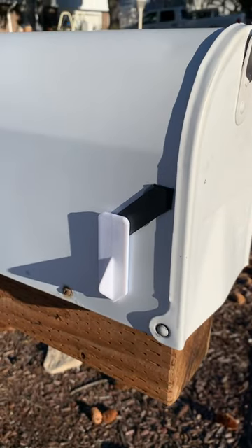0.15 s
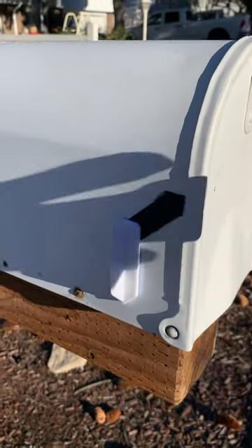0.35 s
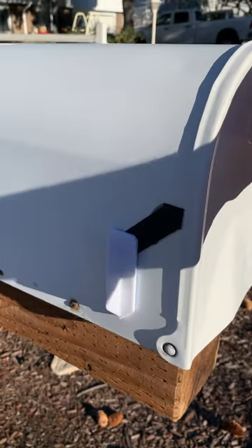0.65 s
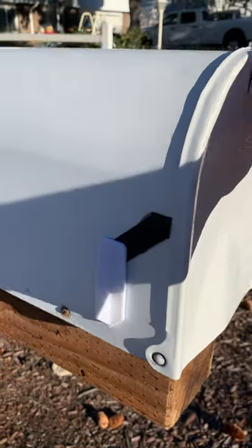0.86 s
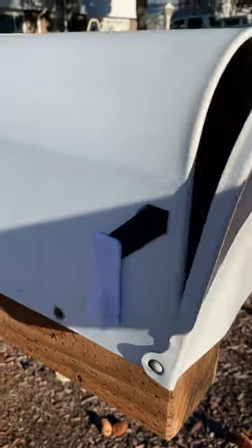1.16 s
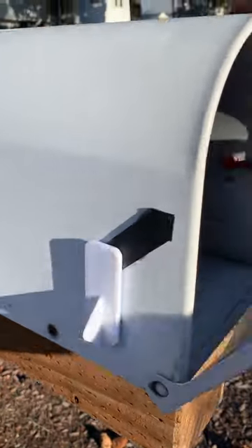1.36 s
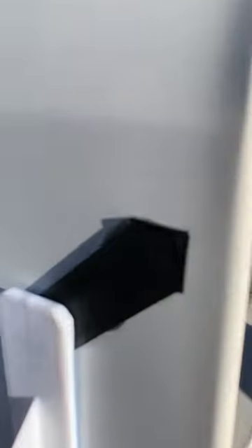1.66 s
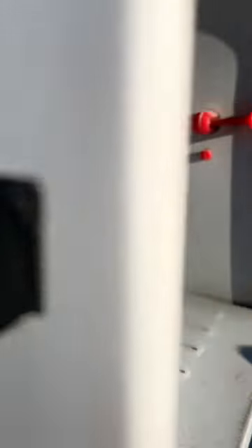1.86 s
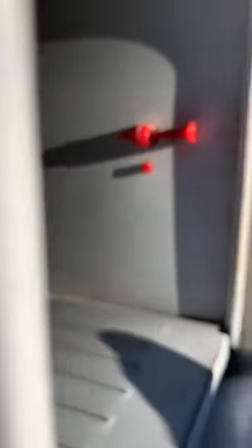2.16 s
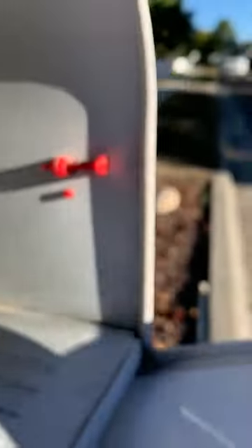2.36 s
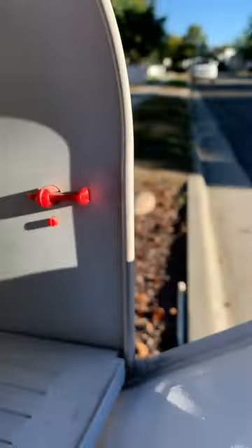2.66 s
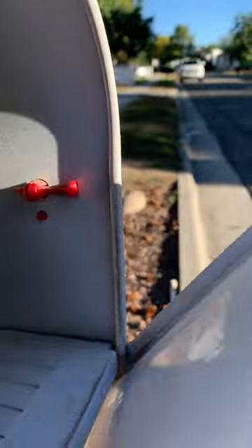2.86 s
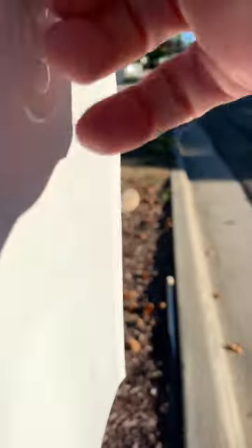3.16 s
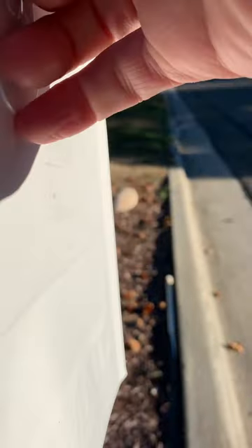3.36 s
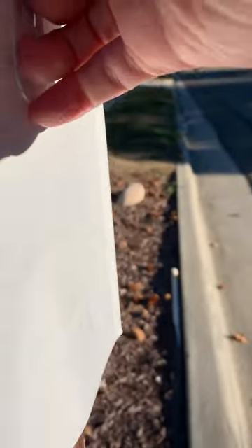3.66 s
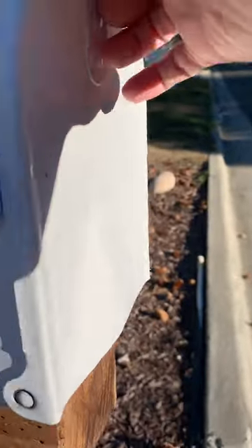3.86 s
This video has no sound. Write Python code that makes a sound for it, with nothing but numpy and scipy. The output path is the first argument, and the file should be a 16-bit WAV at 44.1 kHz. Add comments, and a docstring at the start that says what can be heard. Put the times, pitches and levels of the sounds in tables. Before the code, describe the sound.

A metal mailbox door, heard close outdoors: a short latch creak and light knocks, then hinge scraping and clanks, heavy hollow bangs, a sharp ringing snap and a last creak, over faint birds and distant traffic.

```python
"""A sheet-metal mailbox by a quiet street, heard from close by: its door is knocked, scrapes and snaps shut.
Blows and scrapes are contact forces that excite the decaying modes of the box; heavy blows rock its post.
The latch creaks by stick-slip, the catch rings, and the hinge squeaks in one high resonance.
A sleeve rustles and the handled box rumbles (shaped noise). Behind them small birds chirp and whistle
(gliding tones with echoes) and distant traffic hums (shaped noise)."""
import sys
import numpy as np
from scipy import signal
from scipy.fft import rfft, irfft
from scipy.io import wavfile

SR = 44100
rng = np.random.default_rng(int(sys.argv[2]) if len(sys.argv) > 2 else 0)


def inscribe(sig):
    """Save sig as 16-bit PCM at rate SR to the path in sys.argv[1].

    A 1-D sig is mono; a 2-D sig holds one channel per row.
    Samples are clipped to [-1, 1] before scaling.
    """
    pcm = np.round(np.clip(np.atleast_2d(sig).T, -1, 1) * 32767)
    wavfile.write(sys.argv[1], SR, pcm.astype(np.int16))


N = 176400
T = np.arange(N) / SR
HZ = np.arange(N + 1) * SR / (2 * N)   # frequency bins of a transform of length 2 N
HALF_SECOND = SR // 2   # length of every impulse response [samples]
BLOW_SPREAD_DB = 4.5   # how unequally a contact spot excites the modes


def from_db(db):
    """Amplitude gain is ten to the power of decibels over twenty."""
    return 10 ** (np.asarray(db) / 20)


def rms_one(x):
    """Normalise the mean power: unit rms."""
    return x / np.sqrt(np.mean(x ** 2) + 1e-20)


def unit_energy(x):
    """Normalise the total energy: unit sum of squares."""
    return x / np.sqrt(np.sum(x ** 2) + 1e-20)


def level(rows):
    """Envelope: gain over time through (time [s], level [dB]) points, silent outside them."""
    s, db = np.transpose(rows)
    return np.interp(T, s, from_db(db), left=0, right=0)


def colour(points):
    """Spectral envelope: gain through (frequency [Hz], level [dB]) points on a log-frequency axis."""
    hz, db = np.transpose(points)
    return from_db(np.interp(np.log(HZ + 1), np.log(hz), db))


def noise(points):
    """Subtractive synthesis: white noise filtered to a spectral envelope, unit rms."""
    white = rng.standard_normal(2 * N)
    return rms_one(irfft(rfft(white) * colour(points))[:N])


def drift(cutoff_hz):
    """Random modulation: low-passed white noise of unit rms."""
    lowpass = signal.butter(2, cutoff_hz, fs=SR, output="sos")
    return rms_one(signal.sosfilt(lowpass, rng.standard_normal(N)))


def dying(t60):
    """Exponential decay by 60 dB in t60 seconds, as of a linearly damped mode."""
    return np.exp(-np.minimum(np.log(1000) * T[:HALF_SECOND] / t60, 60))


def tail(spectrum, t60):
    """Dense modal decay: coloured noise under one exponential."""
    return noise(spectrum)[:HALF_SECOND] * dying(t60)


def ring(modes):
    """Modal synthesis: one damped sine per row of (frequency [Hz], level [dB], t60 [s])."""
    return np.array([from_db(db) * np.sin(2 * np.pi * hz * T[:HALF_SECOND]) * dying(t60)
                     for hz, db, t60 in modes])


def through(x, response):
    """Linear system: convolve a force or sound with an impulse response."""
    return signal.fftconvolve(x, response)[:N]


def add(out, s, x):
    """Superposition: mix a sound in at s seconds."""
    i = max(int(s * SR), 0)
    out[i:i + len(x)] += x[:max(N - i, 0)]


def box_responses(modes, washes):
    """Impulse response of the box in each register: main modes plus panel wash, band-passed."""
    # registers boom, body, clang, tick: (lower edge [Hz], upper edge [Hz])
    registers = [(150, 300), (300, 1200), (1200, 4800), (4800, 16000)]
    responses = []
    for band, wash in zip(registers, washes):
        bandpass = signal.butter(3, band, "band", fs=SR, output="sos")
        responses.append(unit_energy(signal.sosfilt(bandpass, modes + wash)))
    return responses


def slips():
    """Dry friction as a random train of uneven micro-impacts of metal on metal, unit rms."""
    slips_per_s, spread_db = 600, 5   # mean rate, scale of the exponential spread
    sizes = from_db(spread_db * np.minimum(rng.exponential(1, N), 4))
    signs = rng.choice([-1, 1], N)
    return rms_one(sizes * signs * (rng.random(N) < slips_per_s / SR))


def door():
    """Source and resonator: knocks and scrapes drive the same main modes, crack and panel wash."""
    # main modes of the box: (frequency [Hz], relative level [dB], t60 [s])
    box_modes = [(211.5, 3.5, 0.25), (250, 5, 0.12), (302.3, 0, 0.061), (441.7, -4, 0.11),
                 (507.6, 7.5, 0.11), (851.5, 3, 0.092), (1149, -0.5, 0.066), (1431, -4, 0.12),
                 (1590, -11, 0.23), (1878, -8.5, 0.15), (1950, -11.5, 0.072), (2173, -8.5, 0.13),
                 (3665, -11, 0.06)]
    # spectrum of its crowd of weaker panel modes: (frequency [Hz], relative level per Hz [dB])
    panel = [(100, -45), (300, -2.5), (600, 4), (1200, 2.5), (2100, -7), (2700, -10.5), (3700, -8.5),
             (5000, -11.5), (9000, -16), (15000, -25.5)]
    panel_db, panel_t60_s, treble_t60_s = 7, 0.15, 0.074
    crack_db, crack_t60_s = 15, 0.028
    modes = ring(box_modes)
    crack = from_db(crack_db) * tail(panel, crack_t60_s)
    t60s = [panel_t60_s] * 3 + [treble_t60_s]   # one per register
    washes = np.array([crack + from_db(panel_db) * tail(panel, t60) for t60 in t60s])
    return knocks(modes, washes) + scrapes(modes, washes)


def knocks(modes, washes):
    """Impact excitation: each blow is a rising graze, a touch and dying chatter that drive the box."""
    # blows: (time [s], boom [dB], body [dB], clang [dB], tick [dB], chatter time constant [s])
    # a level sets the energy: that of 20 ms at this rms
    blows = [(0.942, -29, -32, -36.5, -42.5, 0.011), (1.052, -26.5, -32.5, -35.5, -35, 0.035),
             (1.079, -29.5, -41, -37.5, -47, 0.012), (1.123, -32, -34.5, -52, -61, 0.074),
             (1.922, -46, -48, -53.5, -57.5, 0.024), (2.447, -42, -44, -26.5, -44, 0.061),
             (2.492, -28, -24.5, -25, -37.5, 0.012), (2.537, -34, -39, -29, -47, 0.018),
             (2.583, -59, -48, -55, -46.5, 0.004), (3.128, -23, -22.5, -29, -30.5, 0.027),
             (3.1439, -30.5, -30, -28, -43.5, 0.0082), (3.163, -23, -27, -31.5, -42.5, 0.095),
             (3.2238, -18, -25, -30.5, -27.5, .0066), (3.265, -44, -28.5, -35.5, -49, 0.0027),
             (3.358, -34, -30.5, -35, -50, 0.017), (3.5701, -37.5, -32, -19.5, -25.5, 0.0059),
             (3.907, -40, -33, -30.5, -42.5, 0.022)]
    # weight of the touch pulse against the chatter: boom, body, clang, tick
    first_touch = [3.1, 0.63, 0.82, .2]
    touch_s = 0.0096   # chatter time at which the pulse has just these weights; shorter chatter, stronger pulse
    lead_in_share = .3   # time constant of the graze as a share of the chatter's
    out, lead = np.zeros(N), SR // 20
    since = T[:SR // 3] - T[lead]   # time from the touch
    for s, *levels_db, chatter_s in blows:
        age = np.where(since < 0, -since / lead_in_share, since) / chatter_s
        rattle = slips()[:len(since)] + .5 * rng.standard_normal(len(since))
        chatter = unit_energy(rattle * np.exp(-np.minimum(age, 20)))
        # each blow strikes the modes with other strengths
        struck = from_db(BLOW_SPREAD_DB * rng.standard_normal(len(modes))) @ modes
        for response, db, touch in zip(box_responses(struck, washes), levels_db, first_touch):
            force = chatter + touch * touch_s / chatter_s * (since == 0)
            blow = unit_energy(through(force, response)) * np.sqrt(SR / 50)
            add(out, s - T[lead], from_db(db) * blow)
    return out


def scrapes(modes, washes):
    """Friction excitation: hinge and rim slip while contact wanders between two spots with other modes."""
    # rubbing pressure of hinge and of rim: (time [s], level [dB])
    hinge = [(2.134, -60), (2.138, -31.5), (2.18, -38), (2.26, -34), (2.274, -27), (2.36, -48),
             (2.416, -29.5), (2.47, -44), (2.56, -36), (2.61, -64), (2.7, -44), (2.76, -73), (2.88, -43),
             (3.1, -62)]
    rim = [(3.45, -52), (3.485, -38), (3.52, -37), (3.54, -27.5), (3.59, -37), (3.70, -57), (3.75, -43.5),
           (3.81, -79)]
    # their balance over the registers [dB]: boom, body, clang, tick
    hinge_db = [-9.5, 0.5, -8.5, -18.5]
    rim_db = [-8.5, -2, -7, -24]
    wash_db = -7
    pressure = from_db(hinge_db)[:, None] * level(hinge) + from_db(rim_db)[:, None] * level(rim)
    out, wander = np.zeros(N), drift(10.7)
    favoured = BLOW_SPREAD_DB * rng.standard_normal(len(modes))
    for spot in (-1, 1):
        share = np.sqrt((1 + spot * np.tanh(2 * wander)) / 2)   # the two powers sum to one
        forces = share * slips() * pressure
        responses = box_responses(from_db(spot * favoured) @ modes, from_db(wash_db) * washes)
        for force, response in zip(forces, responses):
            out += through(force, response)
    return out


def post():
    """Low-frequency modes: heavy blows rock the box on its post; the deepest bass does not radiate."""
    # blows: (time [s], level [dB])
    thuds = [(1.117, -37.5), (2.495, -37), (2.54, -34.5), (3.133, -27.5), (3.227, -28.5)]
    # modes of box on post: (frequency [Hz], relative level [dB], t60 [s])
    post_modes = [(67.3, -1, 0.49), (88.6, 0, 0.33), (115, 4.5, 0.2)]
    out = np.zeros(N)
    for s, db in thuds:
        add(out, s, from_db(db) * ring(post_modes).sum(axis=0))
    return signal.sosfilt(signal.butter(2, 60, "high", fs=SR, output="sos"), out)


def catch():
    """Free vibration: the spring catch gives one short, hard ring and a faint singing tail."""
    # modes of the catch: (frequency [Hz], relative level [dB], t60 [s])
    catch_modes = [(1680, -8.5, 0.018), (1980, -4.5, 0.026), (3670, -6.5, 0.011), (1546, -22.5, 0.17)]
    snap_s, snap_db = 3.5705, -3.5
    out = np.zeros(N)
    add(out, snap_s, from_db(snap_db) * ring(catch_modes).sum(axis=0))
    return out


def creaks():
    """Stick-slip oscillation: the latch swells into a rough harmonic tone, lets go and rings out, sagging."""
    # creaks of the latch: (time of the peak [s], level [dB], mean pitch at the peak [Hz])
    latch = [(.946, -21, 430.2), (3.909, -15, 390.5)]
    # mean level of each harmonic from the first up [dB]
    partials_db = [2.5, -12.5, -20, -14, -18.5]
    rise_s, fall_s, tail_s, tail_db = .027, .003, .05, -9
    jitter, sag_per_s = .065, .5   # as fractions of the pitch
    rest = from_db(tail_db)
    out = np.zeros(N)
    for s, db, hz in latch:
        before, after = np.maximum(s - T, 0), np.maximum(T - s, 0)
        swell = np.maximum(1 - before / rise_s, 0) ** 2
        release = (1 - rest) * np.exp(-after / fall_s) + rest * np.exp(-after / tail_s)
        pitch = hz * (1 - sag_per_s * np.clip(T - s, -.05, .05) + jitter * drift(152.0))
        phase = 2 * np.pi * np.cumsum(pitch) / SR
        tone = np.zeros(N)
        for k, part_db in enumerate(partials_db, 1):
            tone += from_db(part_db + 2 * drift(44)) * np.sin(k * phase)
        out += from_db(db) * swell * release * tone
    return out


def squeaks():
    """Resonance under friction: bursts of slips set the hinge pin singing in one high mode."""
    # bursts: (time of the peak [s], level [dB])
    bursts = [(2.295, -33.5), (2.54, -39)]
    hz, width_s, t60_s = 3680, 0.011, 0.017
    song = rms_one(through(slips(), ring([(hz, 0, t60_s)])[0]))
    return song * sum(from_db(db) * np.exp(-((T - s) / width_s) ** 2) for s, db in bursts)


def handling(grain_db=2, lump_db=2):
    """Modulated noise: the grainy rustle of the sleeve and the low rumble of the handled box."""
    # strength of sleeve and of rumble: (time [s], level [dB])
    sleeve = [(0, -69), (1.0, -67), (1.1, -51.5), (1.3, -49), (1.55, -57.5), (2.0, -74), (2.225, -46.5),
              (2.38, -81), (2.68, -54), (2.85, -42), (3.1, -40), (3.3, -51.5), (3.45, -76), (4, -61.5)]
    rumble = [(0, -57), (1.0, -50), (1.15, -39), (1.5, -44.5), (2.0, -50.5), (2.4, -43.5), (2.55, -36.5),
              (2.8, -52.5), (2.865, -34.5), (2.92, -42), (3.05, -42.5), (3.25, -33), (3.5, -50), (4, -51.5)]
    # their spectra: (frequency [Hz], relative level [dB])
    sleeve_colour = [(200, 13), (500, 0.5), (1200, 7), (2500, 0), (4000, 1.5), (7000, -2.5), (10000, -5.5),
                     (15000, -11.5)]
    rumble_colour = [(30, -62), (60, 1), (100, 7), (160, -12), (225, 2), (330, -16), (470, -7.5),
                     (800, -16), (2000, -62)]
    rustling = level(sleeve) * noise(sleeve_colour) * from_db(grain_db * drift(180))
    rumbling = level(rumble) * noise(rumble_colour) * from_db(lump_db * drift(7.3))
    return rustling + rumbling


def birds():
    """Frequency modulation: two-voiced warbling hooks and gliding whistles, smeared by street echoes."""
    # hooked chirps: (start [s], level [dB])
    chirps = [(.125, -53), (.27, -54), (.43, -54), (.64, -55), (.815, -50), (1.225, -53), (1.40, -50),
              (1.44, -51), (1.70, -47), (2.05, -52), (2.34, -52), (2.555, -48), (3.805, -51)]
    # pitch of a hook: (time in the chirp [s], frequency [Hz])
    chirp_shape = [(0, 3400), (.015, 4250), (.036, 3510), (.065, 3256)]
    # straight whistles: (start [s], first pitch [Hz], last pitch [Hz], level [dB])
    whistles = [(.325, 3230, 4300, -45.5), (0.563, 2900, 3700, -47.5), (0.34, 9800, 4900, -57)]
    call_s, warble, pitch_spread = 0.055, 0.028, 0.026   # the last two as fractions of the pitch
    second_voice, second_voice_db = 1.1, 0   # parallel voice: pitch ratio and level at the start
    echo_db, echo_t60_s = 3.5, 0.12
    u = np.linspace(0, 1, int(call_s * SR))   # progress through a call
    hook = np.interp(u * call_s, *np.transpose(chirp_shape))
    calls = [(s, hook, db, from_db(second_voice_db)) for s, db in chirps]
    calls += [(s, low + (high - low) * u, db, 0) for s, low, high, db in whistles]
    out = np.zeros(N)
    for s, glide, db, second in calls:
        detune = pitch_spread * rng.standard_normal()
        pitch = glide * (1 + detune + warble * (1 - u) * drift(430)[-len(u):])
        phase = 2 * np.pi * np.cumsum(pitch) / SR
        # the second voice fades as the first grows
        voices = np.sqrt(u) * np.sin(phase) + second * (1 - u) * np.sin(second_voice * phase)
        add(out, s, from_db(db) * np.sqrt(abs(np.sin(np.pi * u))) * voices)
    echo = unit_energy(rng.standard_normal(HALF_SECOND) * dying(echo_t60_s))
    return out + from_db(echo_db) * through(out, echo)


def street():
    """Stationary broadband noise: the hum of distant traffic."""
    # spectrum: (frequency [Hz], relative level [dB])
    hum = [(25, -52), (45, -2), (85, 3), (125, 1.5), (165, -2), (220, -9.5), (350, -13.5), (700, -15),
           (1200, -17), (2300, -34.5), (3600, -26.5), (6000, -34), (15000, -88)]
    return from_db(-47.5) * noise(hum)


def street_side():
    """Antiphase noise: the width of the street, of opposite sign at left and right."""
    # spectrum: (frequency [Hz], relative level [dB])
    side = [(60, -18), (800, 10), (1400, 3), (2500, -17), (12000, -65)]
    return from_db(-56.5) * noise(side) * np.array([[1], [-1]])


def reflections(x):
    """Diffuse scattering: a short noise response, independent at each side, for the near reflections."""
    # spectrum: (frequency [Hz], relative level [dB])
    diffuse = [(150, -13.5), (700, 16), (10000, -8.5)]
    scatter = np.array([through(x, unit_energy(tail(diffuse, .07))) for _ in range(2)])
    return from_db(-18) * scatter


def microphones(x, shade):
    """Interchannel difference: two close ports hear one sound with other phase and level."""
    # lead of the left port: (frequency [Hz], phase [rad])
    port_phase = [(0, 0), (500, -.7), (1200, .1), (2800, 1.5), (3700, 1.7), (4850, 3.14), (15400, 18.85)]
    # left minus right at full shade: (frequency [Hz], level [dB])
    port_balance = [(220, -2.5), (480, -8), (800, -4), (1150, -4), (1600, -.6), (4000, 0)]
    lead = np.interp(HZ, *np.transpose(port_phase))
    half = colour(port_balance) ** (shade / 2) * np.exp(.5j * lead)
    pair = np.array([half, 1 / half])
    pair = pair / np.sqrt(np.mean(abs(pair) ** 2, axis=0))   # keep the mean power
    return irfft(rfft(x, 2 * N) * pair)[:, :N]


def scene():
    """Superposition: the mailbox with its near reflections, in front of birds and street."""
    box = door() + post() + catch() + creaks() + squeaks()
    near = microphones(box + handling(), shade=1)
    far = microphones(birds() + street(), shade=0.048)
    return near + far + reflections(box) + street_side()


def record(dry):
    """Soft saturation rounds off the loud peaks; a steep elliptic low-pass cuts the top."""
    peak, cutoff_hz = .72, 16000
    lowpass = signal.ellip(10, .1, 80, cutoff_hz, fs=SR, output="sos")
    return signal.sosfilt(lowpass, peak * np.tanh(dry / peak))


dry = scene()
out = record(dry)
inscribe(out)
```